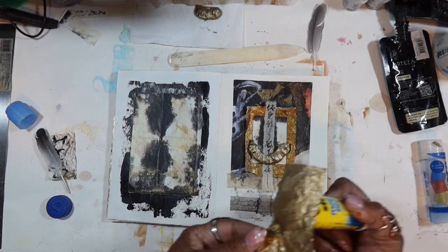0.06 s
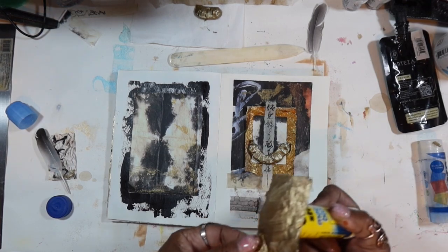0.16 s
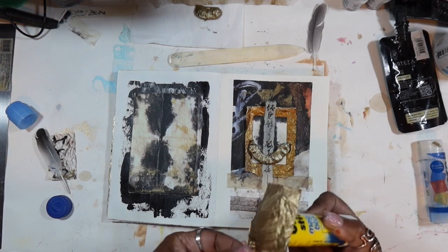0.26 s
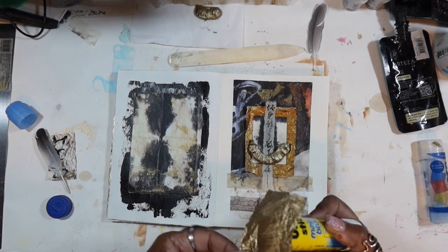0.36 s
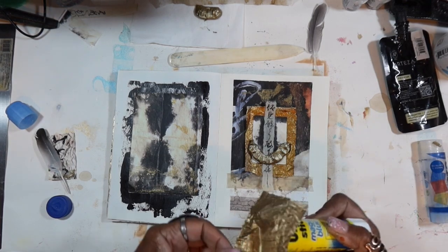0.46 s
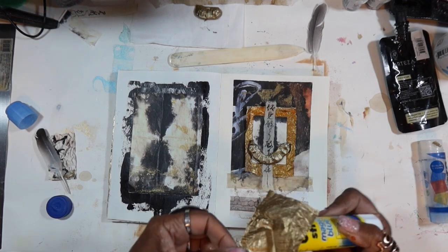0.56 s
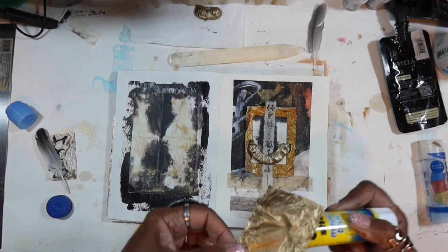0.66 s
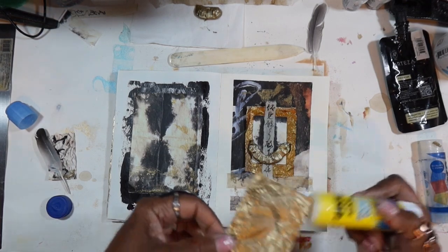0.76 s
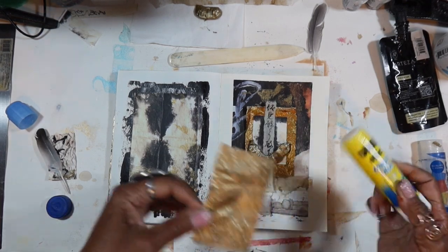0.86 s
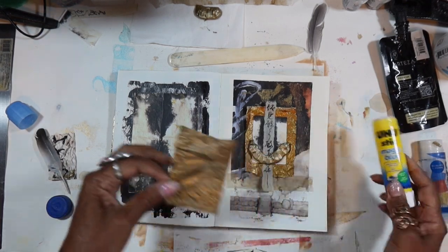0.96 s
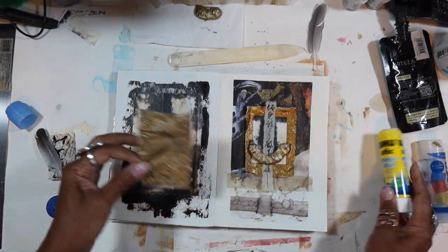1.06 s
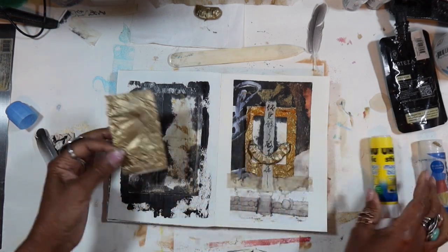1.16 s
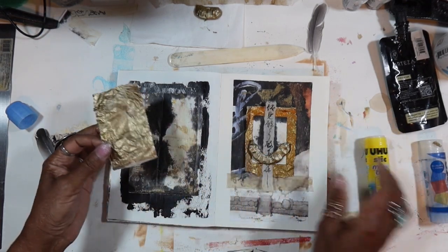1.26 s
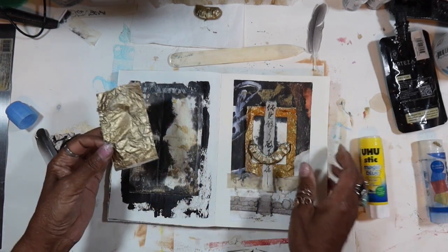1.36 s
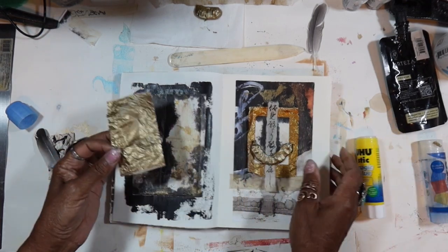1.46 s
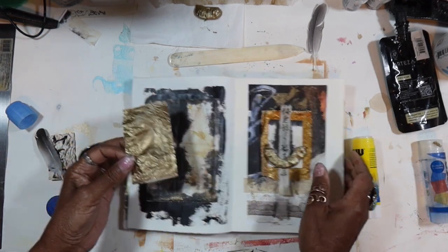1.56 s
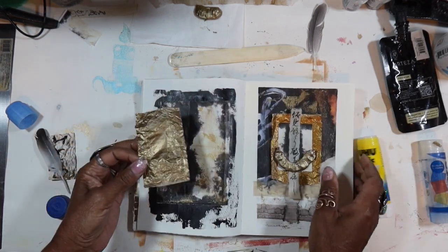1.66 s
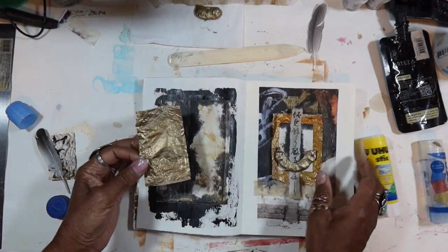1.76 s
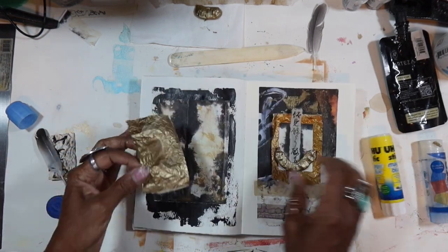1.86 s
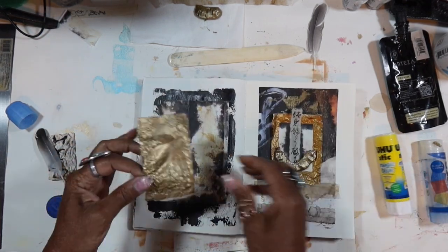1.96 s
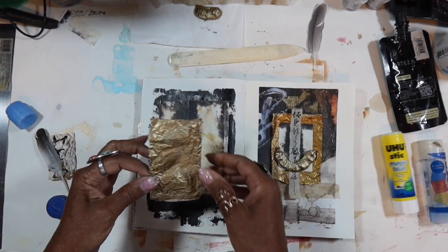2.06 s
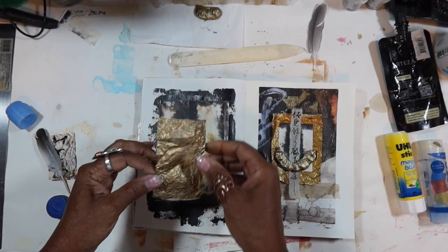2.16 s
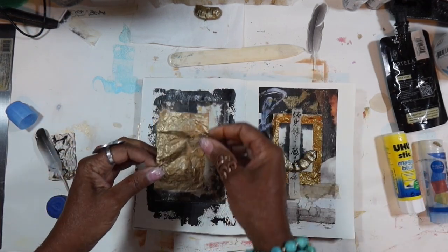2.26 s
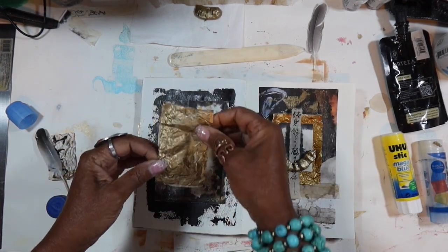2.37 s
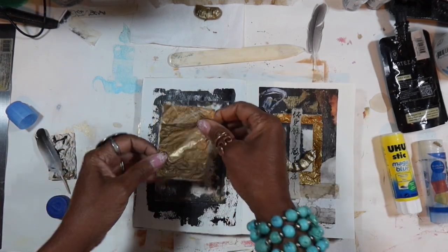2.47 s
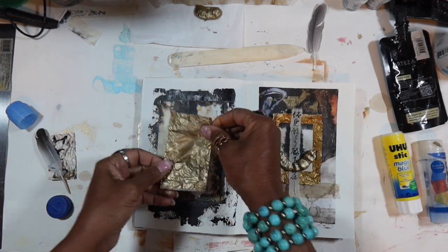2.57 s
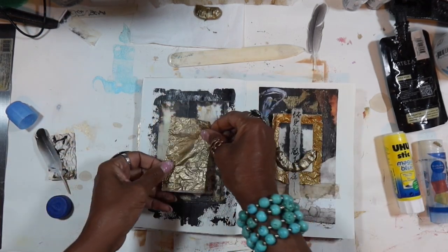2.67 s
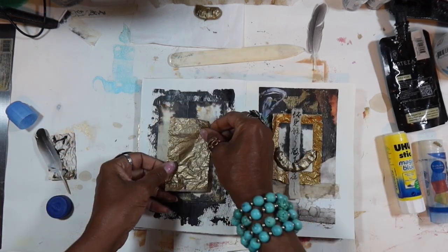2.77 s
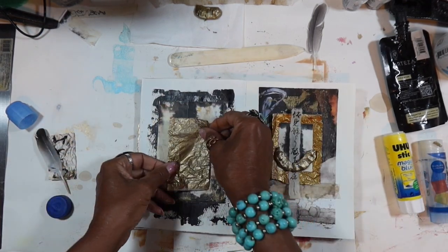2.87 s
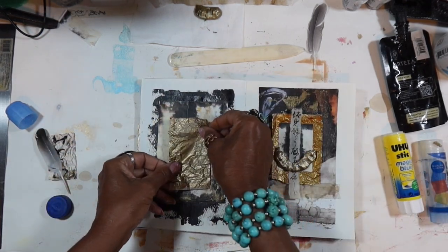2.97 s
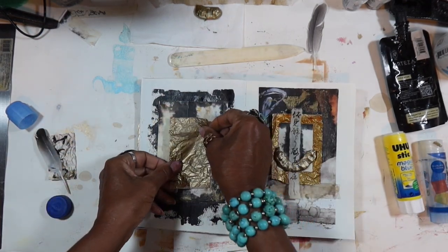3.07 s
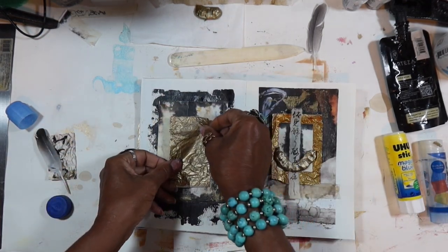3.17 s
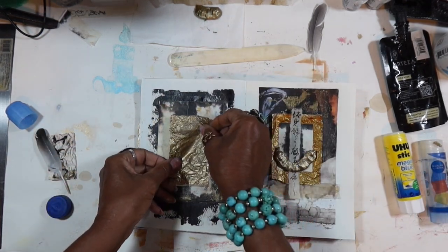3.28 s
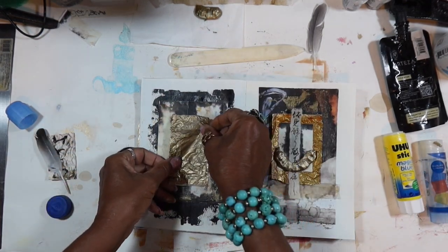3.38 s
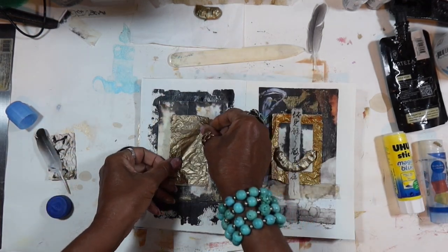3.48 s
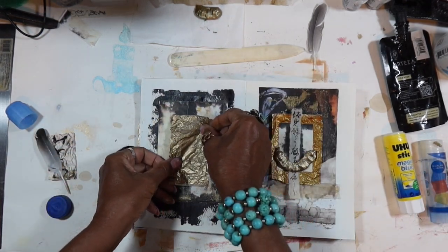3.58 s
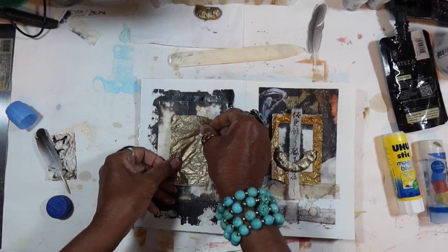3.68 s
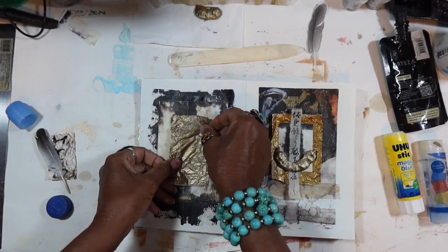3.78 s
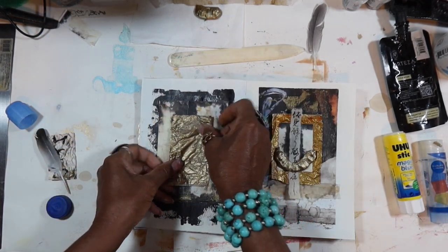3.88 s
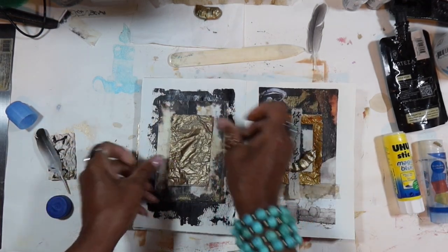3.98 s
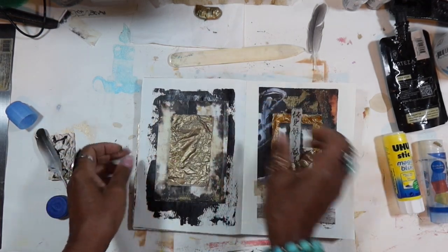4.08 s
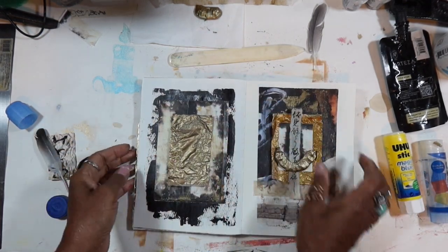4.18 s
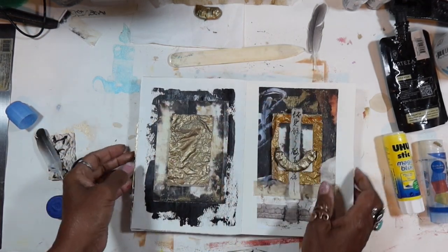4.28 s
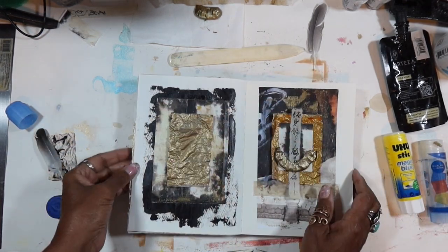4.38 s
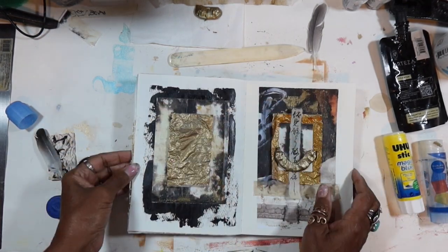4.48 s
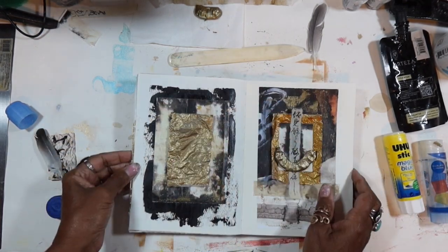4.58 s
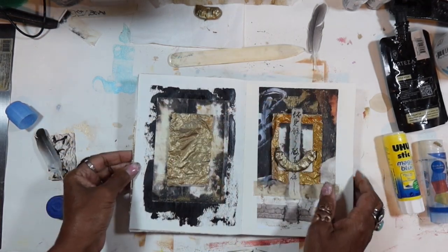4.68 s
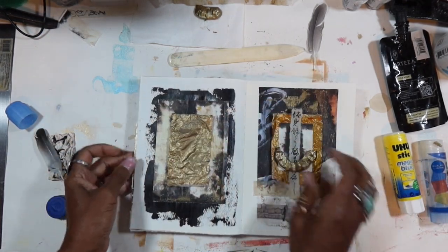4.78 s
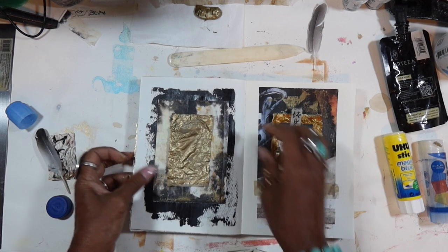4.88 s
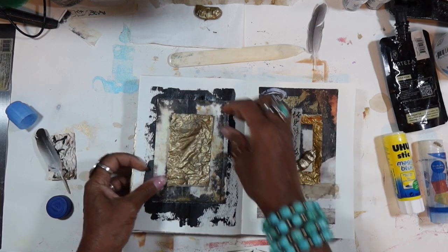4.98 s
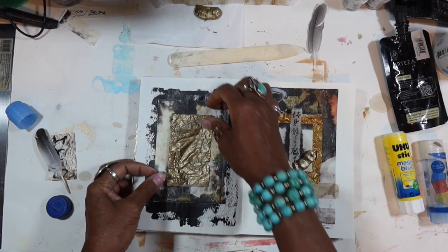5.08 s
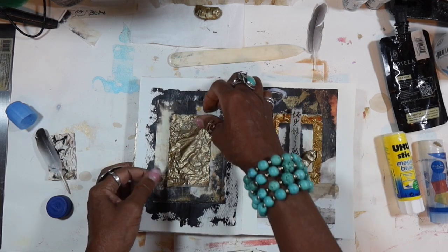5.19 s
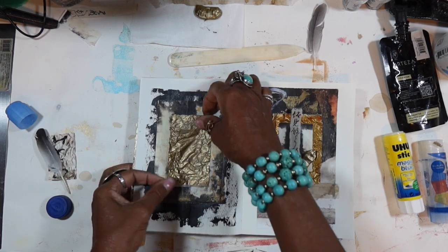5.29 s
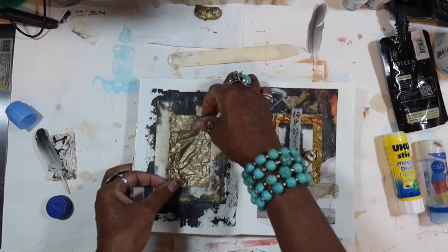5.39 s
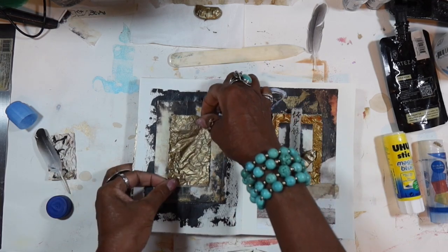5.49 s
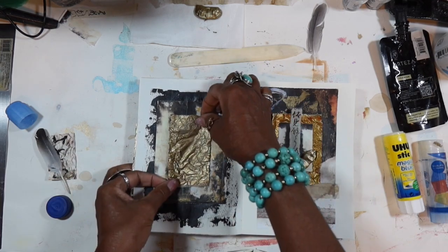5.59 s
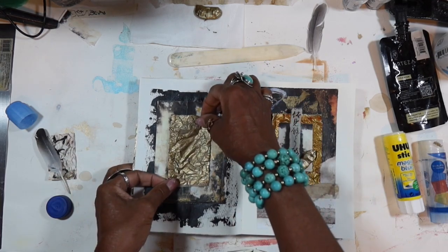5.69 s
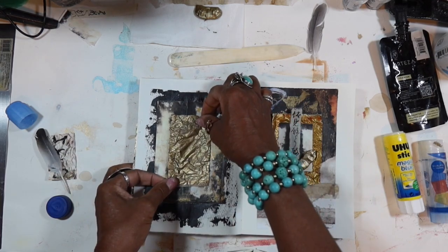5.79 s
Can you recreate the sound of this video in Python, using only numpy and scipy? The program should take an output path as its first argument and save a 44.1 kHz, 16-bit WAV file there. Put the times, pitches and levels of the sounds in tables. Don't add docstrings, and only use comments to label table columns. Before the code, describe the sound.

Close stereo pickup at a craft table in a small quiet room with low fan hum. Foil faintly crackles and sticky glue ticks, then a plastic glue stick lands with a sharp double knock and woody boom just after one second, rocks and slides aside. Soft foil creasing follows, sparse, with a smaller cluster of taps and a scuff just after four seconds.

```python
import sys
import numpy as np
from scipy import signal
from scipy.fft import rfft, irfft, next_fast_len
from scipy.io import wavfile
from scipy.ndimage import map_coordinates

SR = 44100
rng = np.random.default_rng(int(sys.argv[2]) if len(sys.argv) > 2 else 0)


def amplitude_ratio(level_db):
    exponent = np.asarray(level_db, float) / 20
    return 10 ** exponent


def unload_wav(signal):
    wavfile.write(
        sys.argv[1],
        SR,
        np.round(np.clip(np.atleast_2d(signal).T, -1, 1) * 32767).astype(np.int16),
    )


N = 257544


def unit(x):
    return x / np.sqrt(np.mean(x ** 2) + 1e-20)


def along(points, hz):
    f, v = np.transpose(points)
    return np.interp(np.log(hz + 1), np.log(f + 1), v)


def wobble(rate):
    knots = rng.standard_normal(int(N * rate / SR) + 4)
    return map_coordinates(knots, [np.arange(N) * rate / SR])


def coloured(x, gain):
    length = x.shape[-1]
    m = next_fast_len(length + 8192)
    spectrum = rfft(x, m) * gain(np.fft.rfftfreq(m, 1 / SR))
    return unit(irfft(spectrum, m)[..., :length])


def band(x, low_hz, high_hz):
    sos = signal.butter(3, [low_hz, high_hz], "band", fs=SR, output="sos")
    return unit(signal.sosfilt(sos, x))


def spread(pair, spectrum, alike):
    def mid_side_gain(hz):
        turn = np.arccos(np.clip(along(alike, hz), -1, 1)) / 2
        return amplitude_ratio(along(spectrum, hz)) * [np.cos(turn), np.sin(turn)]

    mid, side = coloured(pair, mid_side_gain)
    return unit(np.array([mid + side, mid - side]))


def add(x, s, sound):
    part = x[:, round(s * SR):][:, :sound.shape[-1]]
    part += sound[..., :part.shape[1]]


# t/s, level/dB
AIR_LEVEL = [(0, -54), (.25, -55), (1.0, -51), (1.2, -48.5), (1.35, -54.5), (1.5, -48.5), (2.1, -50),
             (5.84, -49.5)]
# f/Hz, level/dB per Hz
AIR_COLOUR = [(12, -34), (20, -14.5), (107, -1.5), (193, -6.5), (277, -4), (319, -6), (485, -8.5),
              (542, -11.5), (642, -10), (849, -13.5), (1710, -16.5), (6180, -27), (13200, -40.5),
              (14700, -40), (16000, -56)]
# f/Hz, correlation
AIR_LIKENESS = [(60, 1), (180, 0.14), (550, -0.26), (1650, 0.21), (4970, 0.61), (15000, 0.38)]
# f/Hz, level/dB
FAN_TONES = [(53.8, -60.5), (107.7, -62.5), (274.5, -57.5)]


def air():
    s, level_db = np.transpose(AIR_LEVEL)
    floor = amplitude_ratio(np.interp(np.arange(N) / SR, s, level_db))
    hiss = spread(rng.standard_normal((2, N)), AIR_COLOUR, AIR_LIKENESS) * amplitude_ratio(0.91 * wobble(11.0))
    tones = np.zeros(N)
    for hz, db in FAN_TONES:
        phase = 2 * np.pi * np.cumsum(hz + 1.9 * wobble(9.2)) / SR
        tones += amplitude_ratio(db + 49.5 + 1.8 * wobble(10)) * np.sin(phase)
    return floor * (hiss + tones)


# f/Hz, t60/s
ROOM_T60 = [(300, 0.17), (2000, 0.2), (6000, 0.18), (14000, 0.057)]


def room(x):
    hz, t, z = signal.stft(rng.standard_normal((2, SR // 2)), SR, nperseg=256)
    decay = amplitude_ratio(-60 * t / along(ROOM_T60, hz)[:, None])
    tail = signal.istft(z * decay, SR, nperseg=256)[1]
    tail = tail + 0.34 * tail[::-1]
    delayed = np.pad(x, (250, 0))[None]
    return signal.fftconvolve(delayed, tail / np.linalg.norm(tail[0]), axes=1)[:, :N]


# t/s, length/s, scrape level/dB, sheet resonance f/Hz
SLIDES = [(0.441, 0.064, -57, 2270), (.567, 0.17, -63, 4000), (0.859, .1, -57, 1480),
          (0.95, 0.073, -58, 2380), (1.267, 0.073, -60, 3520), (1.408, 0.07, -60.5, 1800),
          (1.775, 0.058, -56, 1810), (2.506, 0.058, -59, 5400), (3.39, 0.052, -59.5, 4500),
          (3.818, 0.032, -59, 2500), (5.064, 0.052, -56.5, 2600), (5.211, 0.032, -59, 2000),
          (5.294, 0.047, -57.5, 3140)]


def slides():
    return [(s, length, db, hz, db - 8, db - 8.5) for s, length, db, hz in SLIDES]


# t/s, length/s, fizz level/dB, sheet resonance f/Hz, scrape over fizz/dB
RUSTLES = [(0.11, 0.026, -61, 8000, -7), (0.66, 0.087, -64.5, 1600, -2), (0.725, 0.0072, -55, 5000, -7),
           (0.747, 0.019, -56.5, 5200, 2), (0.765, 0.019, -61, 5430, 5), (2.275, 0.06, -60.5, 3000, 3),
           (2.35, 0.082, -59.5, 3180, -4), (2.494, 0.09, -54, 3340, -2), (2.661, .053, -62, 3000, 1),
           (3.855, 0.13, -58.5, 4020, 0), (4.278, 0.02, -67, 3000, 8), (4.293, 0.093, -55.5, 2500, 2),
           (4.404, .042, -57.5, 1980, 1.5), (4.7, 0.13, -61, 2500, -10), (5.012, .035, -63, 3000, -14),
           (5.386, 0.061, -56.5, 6000, -7), (5.439, 0.043, -60, 8000, -5), (5.53, 0.019, -63, 6000, 0),
           (5.761, 0.029, -61, 9500, -20)]


def rustles():
    return [(s, length, db + scrape_db, hz, db, db + 0.5) for s, length, db, hz, scrape_db in RUSTLES]


# t/s, length/s, rumble level/dB, sheet resonance f/Hz, fizz over scrape/dB
DRAGS = [
    (0, 0.037, -57, 1500, -6),
    (1.143, 0.074, -38.5, 2500, -30),
    (1.319, 0.02, -47, 2290, -37),
    (1.492, .27, -43, 1200, -2),
    (1.848, 0.048, -52, 1920, -6),
    (2.344, 0.082, -58.5, 1500, -18),
    (4.076, 0.015, -50, 2500, 8),
    (4.086, 0.052, -47.5, 2000, -5),
    (4.18, 0.014, -41.5, 2980, -14),
    (4.193, .035, -42, 1500, -9),
]


def drags():
    return [(s, length, db - 5, hz, db - 5 + fizz_db, db) for s, length, db, hz, fizz_db in DRAGS]


# f/Hz, level/dB per Hz
SCRAPE_COLOUR = [(410, -30), (700, -9), (954, -48), (1160, -8.5), (1590, -5.5), (3300, -7), (9000, -26),
                 (11700, -67), (19800, -120)]
FIZZ_COLOUR = [(2650, -5.5), (4500, -9), (5360, -13), (5900, -11.5), (10100, -10.5), (16000, -17.5)]
RUMBLE_COLOUR = [(88, -48), (150, -9), (188, -49), (215, -22.5), (401, -5.5), (1100, -16.5), (1430, -25),
                 (2420, -120)]


def rubbing():
    out = np.zeros((2, N))
    slips = rng.standard_normal((2, N)) * amplitude_ratio(2.6 * wobble(700) + 1.4 * wobble(150))
    scrape = spread(slips, SCRAPE_COLOUR, [(1000, 1.0), (8000, 0.5)])
    fizz = spread(slips, FIZZ_COLOUR, [(5000, 1.0), (14000, 0.095)])
    low_noise = rng.standard_normal((2, N)) * amplitude_ratio(2.04 * wobble(55))
    rumble = spread(low_noise, RUMBLE_COLOUR, [(500, 1.0)])
    for s, length, scrape_db, sheet_hz, fizz_db, rumble_db in slides() + rustles() + drags():
        span = slice(round(s * SR), round((s + length) * SR))
        body = scrape[:, span]
        resonance = signal.lfilter(*signal.iirpeak(sheet_hz, 4, SR), body)
        body = unit(body + 2.5 * resonance)
        progress = np.linspace(0, 1, body.shape[1]) ** 0.77
        speed = np.sin(np.pi * progress) ** (0.59 + 4.6 * length)
        rub = amplitude_ratio(scrape_db) * body + amplitude_ratio(fizz_db) * fizz[:, span] + amplitude_ratio(rumble_db) * rumble[:, span]
        out[:, span] += speed * rub
    return out


# t/s, peak level/dB, ring f/Hz, crispness/dB
PEELS = [(0.2426, -43.5, 1960, 2), (0.577, -45, 1620, 4), (0.5858, -40.5, 1550, -10),
         (0.6306, -43, 1690, -12), (.638, -42, 1540, -10), (.696, -37.5, 1680, -14), (.878, -45, 1450, 8),
         (1.1052, -39, 1870, 1), (2.38, -52, 1410, -8), (4.0975, -37, 1650, 11.5),
         (5.0542, -42, 1970, -2.5), (5.5071, -41.5, 2110, -4)]


def peels():
    return [(s, db, hz, 8.5, crisp_db, 0.017) for s, db, hz, crisp_db in PEELS]


# t/s, peak level/dB, ring f/Hz, crispness/dB
CREASES = [(0.671, -48, 2950, 10), (0.7137, -38, 1580, -8), (.748, -39, 1600, 7), (.7538, -39, 1610, 10),
           (0.7731, -41, 2730, 15), (.8395, -46.5, 1780, 10), (.9633, -33, 2170, -10),
           (1.7881, -32.5, 1840, -12), (2.356, -41, 1450, -3), (2.4038, -33, 1820, -5),
           (2.439, -39, 2950, -6), (2.5, -37, 1870, -8), (2.5292, -36, 1730, -6), (2.6718, -46, 1710, -1.5),
           (3.0993, -38, 1180, -12), (3.401, -41, 3120, 11), (4.0827, -31, 1890, -13),
           (4.203, -39, 1700, -6), (4.283, -35.5, 1200, -8), (4.2943, -41, 1770, -6),
           (4.3744, -44, 2230, 5), (4.4161, -38, 1860, -11), (5.089, -49, 2650, -2.5),
           (5.2058, -31, 1980, -18)]


def creases():
    return [(s, db, hz, 2, crisp_db, 0.022) for s, db, hz, crisp_db in CREASES]


# t/s, peak level/dB, ring f/Hz
PRICKS = [(.7257, -43, 5920), (.753, -36, 5990), (0.773, -36, 4900), (0.9724, -34, 5400),
          (2.3531, -47, 4390), (2.525, -39, 5370), (2.542, -42, 5530), (3.4004, -35, 4260),
          (3.935, -38, 4220), (4.078, -46, 4300), (4.5527, -46, 4630), (5.03, -41, 7200),
          (5.3896, -44, 4710), (5.4144, -49, 6010), (5.5374, -49, 4530)]


def pricks():
    return [(s, db, hz, -20, -24, 0.016) for s, db, hz in PRICKS]


# t/s, peak level/dB, ring f/Hz, crack/dB, crispness/dB
TAPS = [(.9725, -27, 2490, -4, -0.5), (1.129, -23, 1610, 5, -14), (1.1521, -2.5, 2215, -1.5, -12),
        (1.3216, -18.5, 1343, 2, -24), (1.8735, -29.5, 1990, 11, -7), (3.933, -26.5, 2100, 10, 0),
        (4.1847, -21, 1930, -10, -19), (4.2076, -20.5, 1900, -21, -19), (4.2148, -30, 1200, 0, -4),
        (4.3056, -26, 1970, -12, -8), (4.3134, -27.5, 1270, 2, -7), (4.5531, -22.5, 1820, -16, -26)]


def taps():
    return [(*tap, 0.021) for tap in TAPS]


# t/s, peak level/dB, ring f/Hz
TUBE_KNOCKS = [
    (1.1286, -15.5, 2440),
    (1.1533, -4.5, 2490),
    (1.1554, -16.5, 3200),
    (1.3216, -17, 2040),
    (1.3206, -18.5, 3050),
    (3.098, -35, 1890),
]


def tube():
    return [(*knock, -64, -38, 0.0083) for knock in TUBE_KNOCKS]


def snaps():
    out = np.zeros((2, N))
    t = np.arange(SR // 30) / SR
    kicks = peels() + creases() + taps() + pricks() + tube()
    draws = rng.standard_normal((len(kicks), 2, len(t)))
    for (s, db, hz, crack_db, crisp_db, t60), noise in zip(kicks, draws):
        decay = amplitude_ratio(-60 * t / t60)
        after_slips = noise * decay
        kick = 10 * (t == 0) + after_slips
        onset = 1 - np.exp(-t / 0.00011)
        ring = unit(np.sin(2 * np.pi * hz * t) * decay ** 1.22 * onset)
        crack = band(band(kick[0], 270, max(hz, 6500)), hz / 2, max(hz, 5600))
        spike = band(kick[0] + 0.63 * after_slips[::-1], 4900, 10900)
        snap = ring + amplitude_ratio(crack_db - 6.0) * crack + amplitude_ratio(crisp_db - 6.0) * spike
        add(out, s, amplitude_ratio(db - 25.5) * snap)
    return out


# t/s, force level/dB, contact time/ms, boom level/dB
BLOWS = [(.001, -46.5, 1.2, -46), (1.1290, -1, 1.49, -8), (1.1537, -13.5, 0.6, -11),
         (1.1690, -9, 0.52, -35), (1.322, -61, 0.45, -57), (1.872, -44, 0.19, -51),
         (2.32, -45.5, 0.61, -69), (2.355, -47, 0.43, -71), (2.402, -46, .5, -67), (3.934, -52, 0.29, -51),
         (4.1, -40.5, 0.72, -43), (4.1845, -33.5, .4, -52), (4.201, -48, 0.51, -62),
         (4.2075, -27.5, 0.84, -42)]
# f/Hz, level/dB, t60/s
TABLE_MODES = [(99.6, -20, 0.34), (122.2, -2.5, 0.1), (220, -25, 0.092), (252, 4, 0.045), (285, -3, 0.082),
               (356, -10, 0.13), (445, -21, 0.13), (466.7, 3.5, 0.092), (584, -3.5, 0.087),
               (617, -13, 0.15), (766, -7, 0.098), (870, 0, 0.055)]
# f/Hz, level/dB, time to peak/s
FLEX = [(313.7, 2, 0.0026), (442, -6, 0.0078)]
# f/Hz, level/dB per Hz
BOOM_COLOUR = [(35, -38), (60, -27), (102, -8), (194, -8), (235, -2.5), (364, -8), (424, -8), (542, -9),
               (701, -20), (979, -25), (1300, -27.5), (1690, -27), (2860, -120)]


def table():
    out = np.zeros((2, N))
    t = np.arange(SR // 2) / SR
    modes = np.zeros(len(t))
    for hz, db, t60 in TABLE_MODES:
        modes += amplitude_ratio(db - 60 * t / t60) * np.sin(2 * np.pi * hz * t)
    modes *= 1 - np.exp(-t / 0.0024)
    for hz, db, peak_s in FLEX:
        swell = t / peak_s * np.exp(1 - t / peak_s)
        modes += amplitude_ratio(db) * swell * np.sin(2 * np.pi * hz * t)
    modes = signal.lfilter(*signal.butter(2, 70, "high", fs=SR), modes)
    boom_rise = 1 - np.exp(-(t / 0.014) ** 2)
    for s, force_db, contact_ms, boom_db in BLOWS:
        push = np.sin(np.pi * np.clip(t[:400] / (contact_ms / 1000), 0, 1))
        ring = signal.fftconvolve(modes, push / push.sum())[:len(t)]
        boom = spread(rng.standard_normal((2, len(t))), BOOM_COLOUR, [(200, 1.0), (1200, 0.94)])
        add(out, s, amplitude_ratio(force_db - 4.0) * ring + amplitude_ratio(boom_db - 60 * t / 0.2) * boom_rise * boom)
    return out


def scene():
    ticks = snaps()
    echo = amplitude_ratio(-14.0) * room(ticks.mean(axis=0))
    return air() + rubbing() + table() + ticks * amplitude_ratio([[0.6], [-0.6]]) + echo


def roll_off(x):
    return signal.sosfilt(signal.butter(12, 16320, fs=SR, output="sos"), x)


def record(dry):
    band_limit = signal.butter(16, 15700, fs=SR, output="sos")
    kept = signal.sosfiltfilt(band_limit, np.clip(dry, -1, 1))
    return roll_off(kept)


dry = scene()
out = record(dry)
unload_wav(out)
```